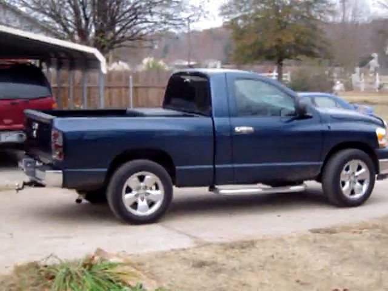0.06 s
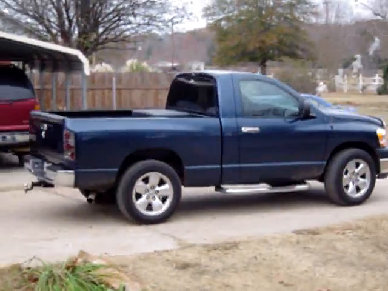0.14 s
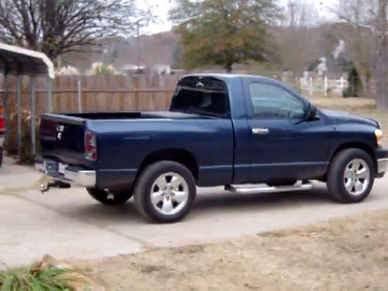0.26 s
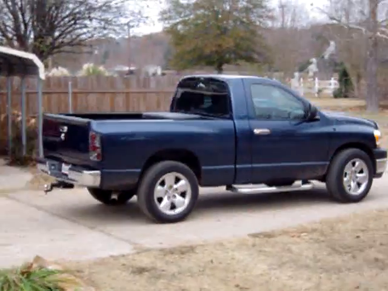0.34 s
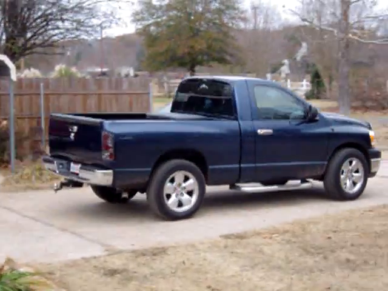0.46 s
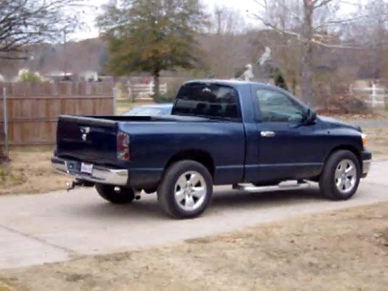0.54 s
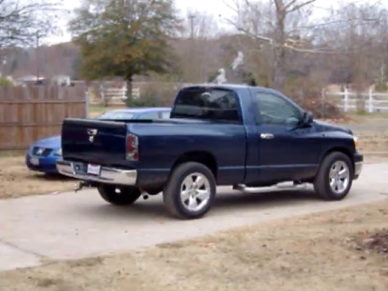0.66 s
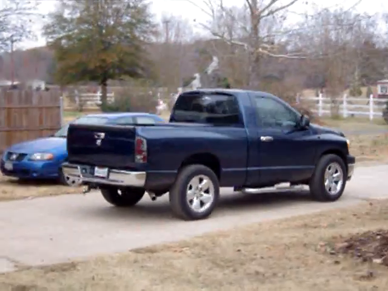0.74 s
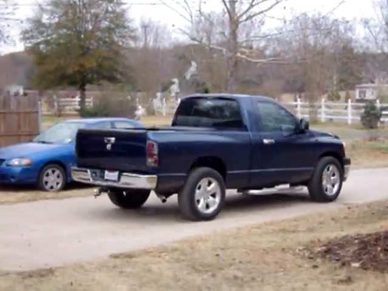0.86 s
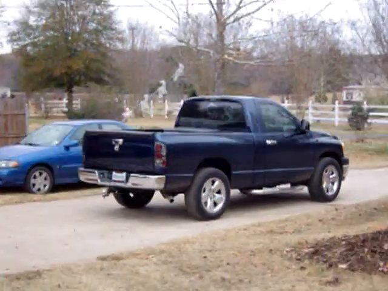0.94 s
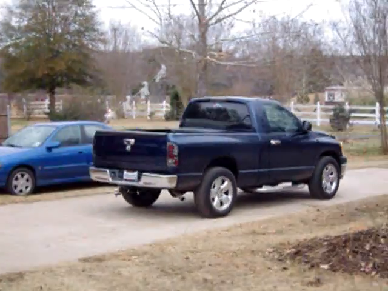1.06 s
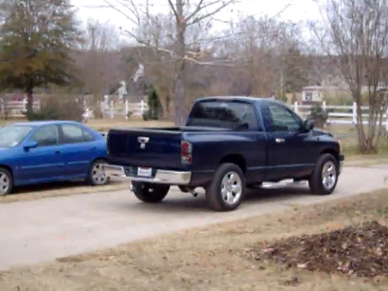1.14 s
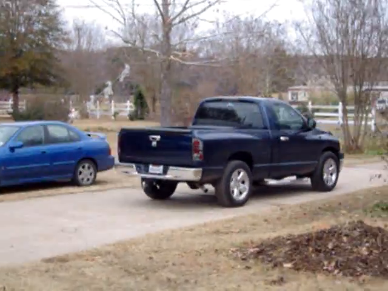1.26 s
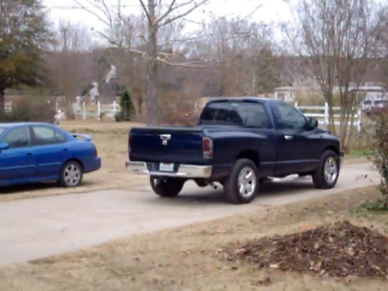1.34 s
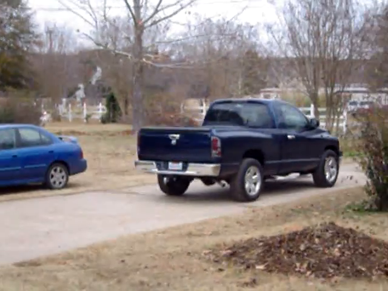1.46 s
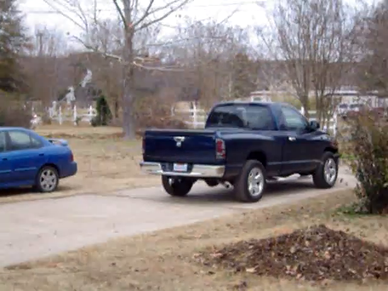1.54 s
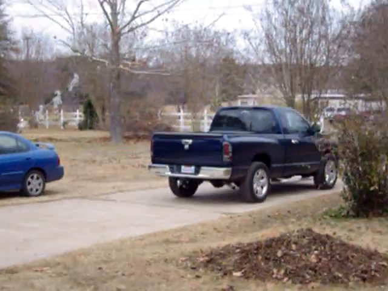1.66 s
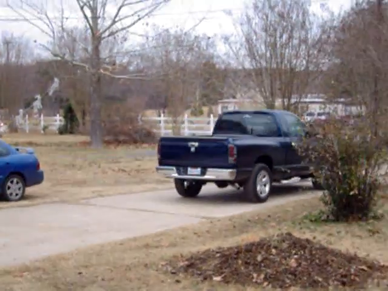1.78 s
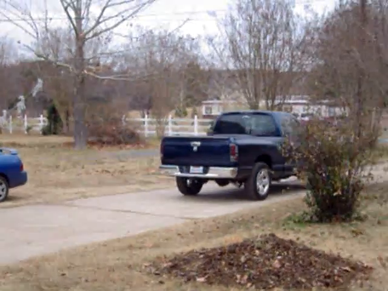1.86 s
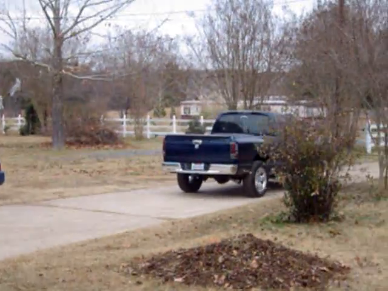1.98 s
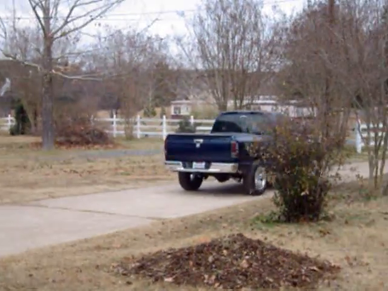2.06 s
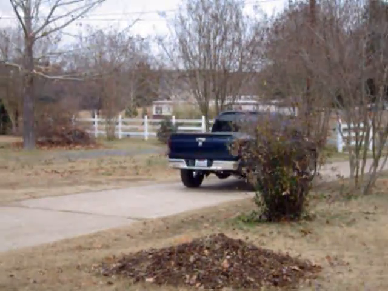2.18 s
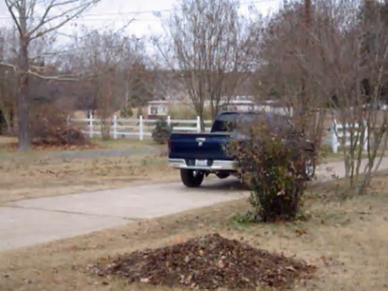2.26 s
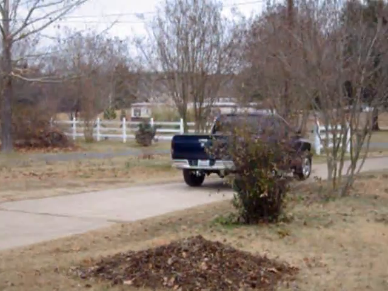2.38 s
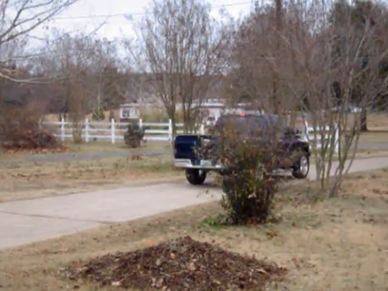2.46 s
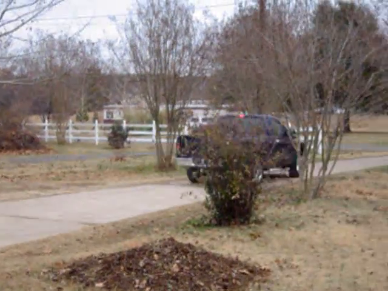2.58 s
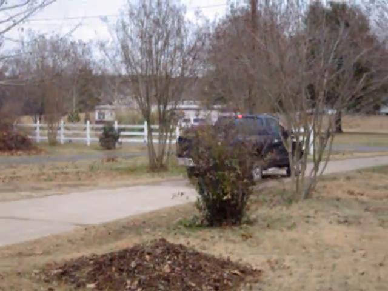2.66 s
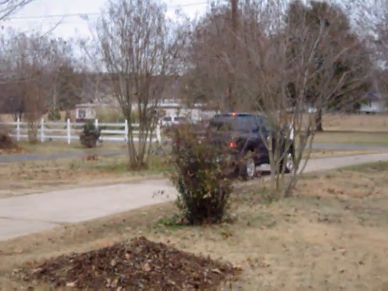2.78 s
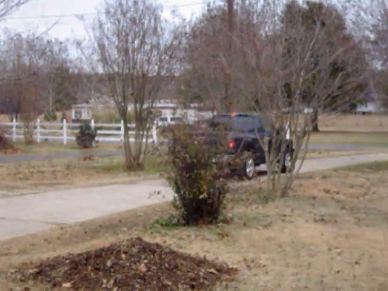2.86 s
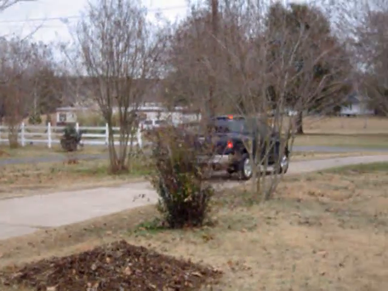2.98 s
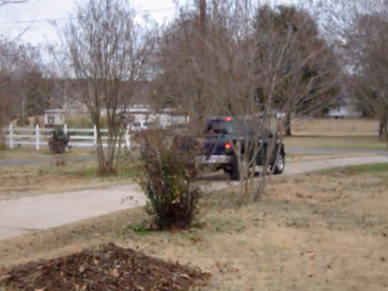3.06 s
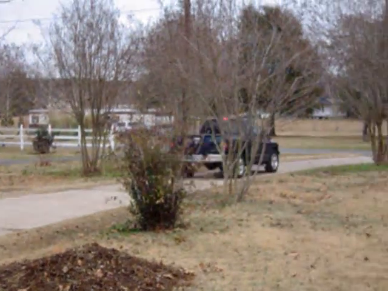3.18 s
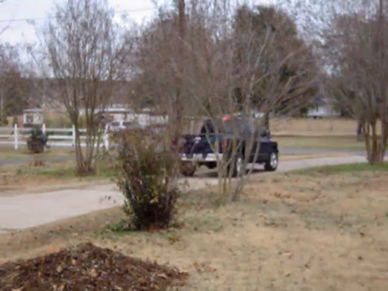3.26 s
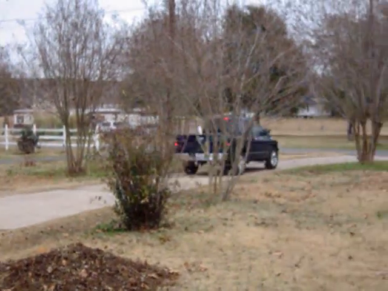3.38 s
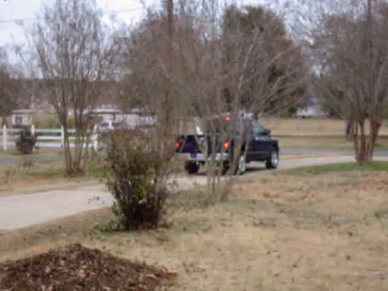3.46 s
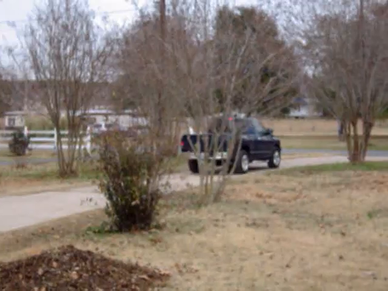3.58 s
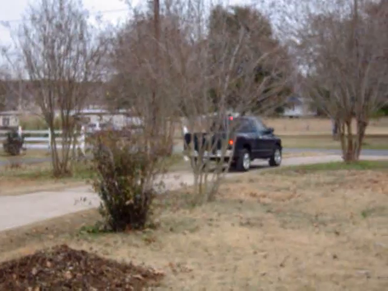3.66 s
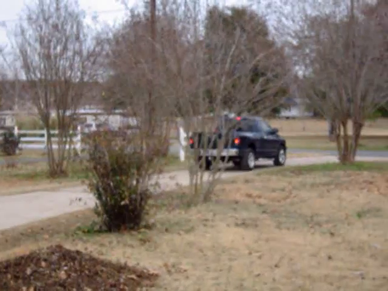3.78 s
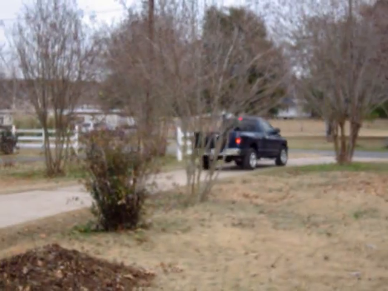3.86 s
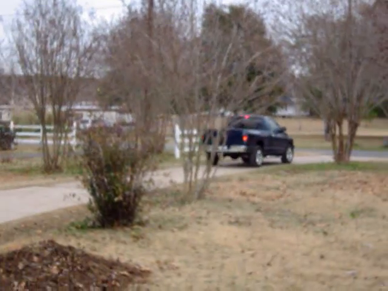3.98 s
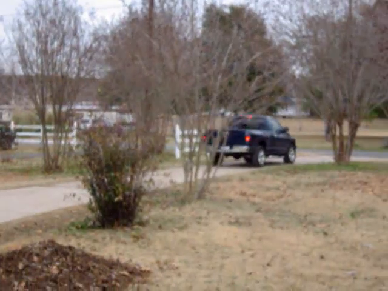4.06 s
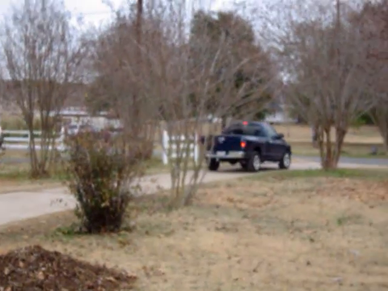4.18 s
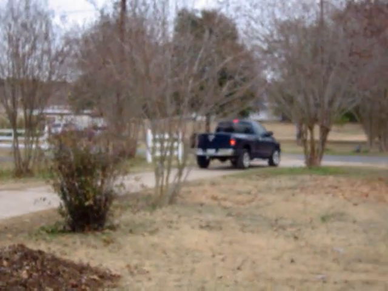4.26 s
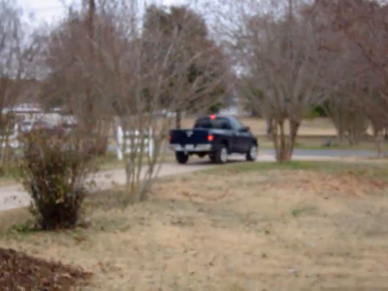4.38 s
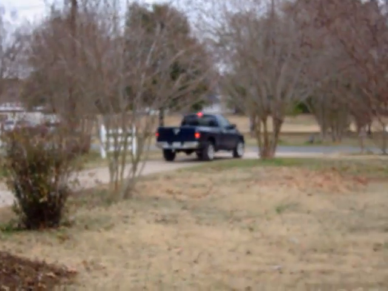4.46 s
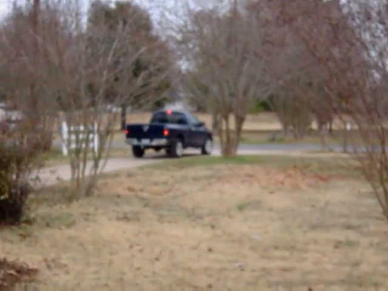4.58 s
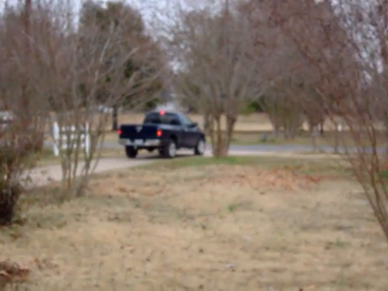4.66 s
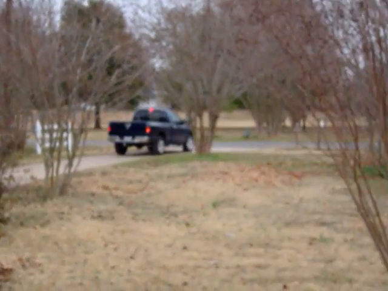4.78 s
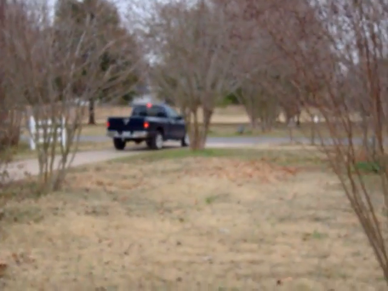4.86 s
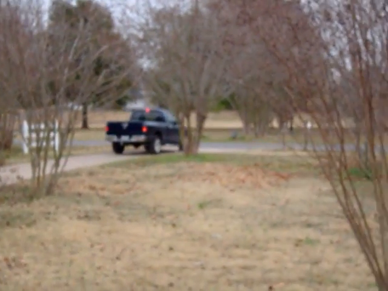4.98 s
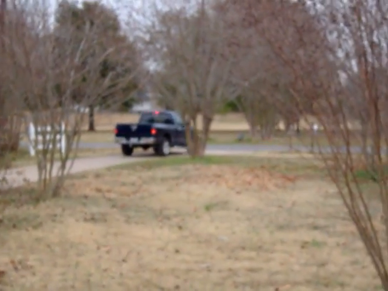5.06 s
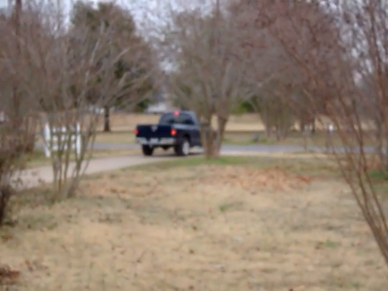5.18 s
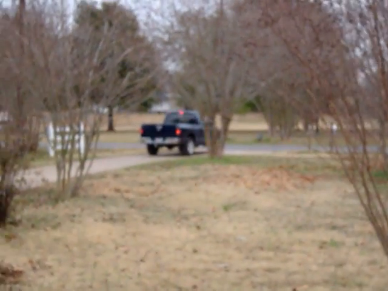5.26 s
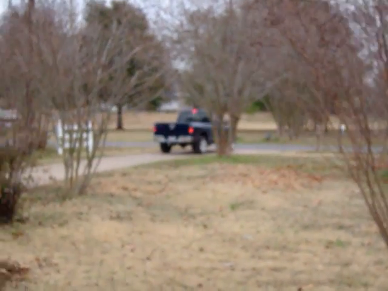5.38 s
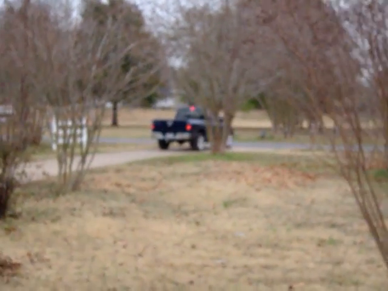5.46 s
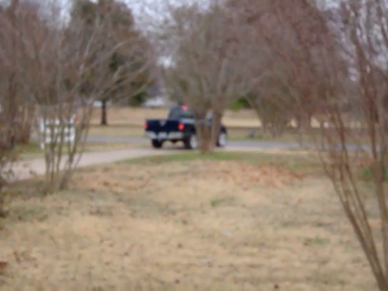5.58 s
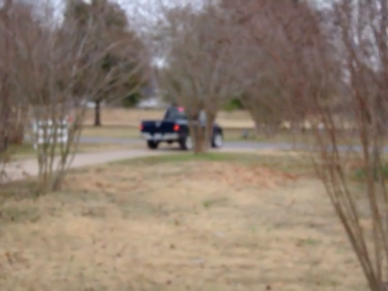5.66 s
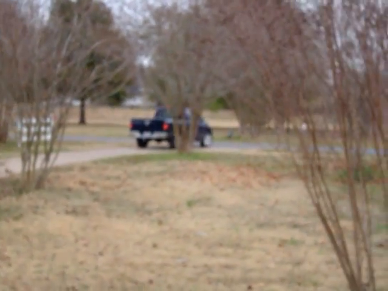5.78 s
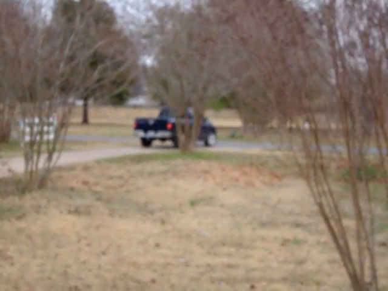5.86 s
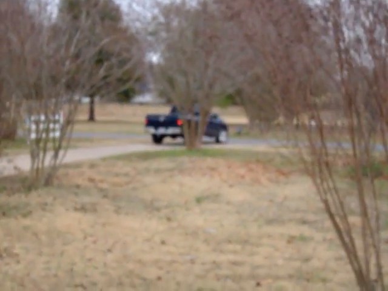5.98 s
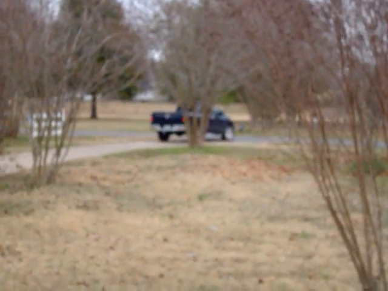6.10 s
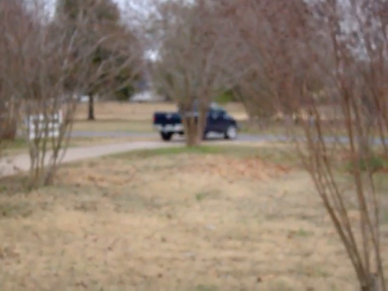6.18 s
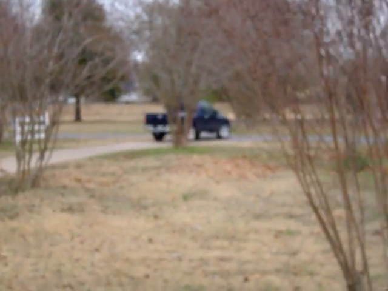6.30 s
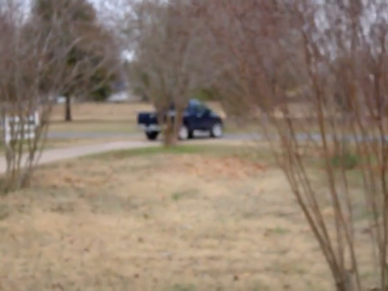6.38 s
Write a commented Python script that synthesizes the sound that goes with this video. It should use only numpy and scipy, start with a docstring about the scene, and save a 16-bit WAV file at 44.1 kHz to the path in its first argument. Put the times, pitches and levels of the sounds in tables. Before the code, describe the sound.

Outdoors, close to a driveway, a pickup's open V8 exhaust is already roaring at 0 s, loud, raspy and tinny, with bright engine hiss. Its pitch sags over the first half second and the level eases; small dry ticks click near the microphone around 0.7 s. From about 0.8 to 2.2 s it pulls steadily, pitch rising slightly, the boom swelling to a second peak near 1.5 s and becoming hollower as the truck shows its tail, with brief metallic overtones flaring. From 2.2 to 3 s the throttle lifts: pitch slides down and the sound collapses to a low burble. It then coasts quietly, settling by 4.5 s into a soft, uneven, throbbing idle far off. A gritty scuff and tick stand out close by around 4.3 s. Faint squeaky twitters flicker from 4.8 to 5.7 s, over steady air hiss and a thin hum, with slight late rubs until 6.4 s.

```python
"""An open V8 exhaust booms and rasps as a pickup pulls away down a concrete drive, lifts off and lopes at idle.
The note is built from orders of the engine cycle, weighted by a booming pipe; some high orders flare up.
Noise puffed at each firing gives rasp, tinny ring, burble, howl and engine bay hiss.
Near the microphone come scuffs and ticks of shaped noise, with faint wavering tones for twitters.
A steady outdoor hiss of coloured noise and a thin sine hum lie underneath."""
import sys
import numpy as np
from scipy import signal
from scipy.fft import rfft, irfft
from scipy.io import wavfile
from scipy.ndimage import uniform_filter1d

SR = 44100
rng = np.random.default_rng(int(sys.argv[2]) if len(sys.argv) > 2 else 0)


def wav_record(signal):
    """Record a signal, one row per channel, as 16-bit PCM in the file named by sys.argv[1]."""
    frames = np.transpose(np.atleast_2d(signal))
    bounded = np.clip(frames, -1, 1)
    # unit amplitude maps onto the largest positive 16-bit level
    quanta = np.round(bounded * 32767).astype(np.int16)
    wavfile.write(sys.argv[1], SR, quanta)


N = 283563
TIME = np.arange(N) / SR

# In every colour table the levels are relative: the filtered noise is brought to rms 1.

# Engine speed. Each row: time in seconds, speed in cycles per second (eight firings to a cycle).
ENGINE_SPEED = [(0.0, 16.3), (0.1, 15.86), (0.27, 14.32), (0.42, 13.54), (0.6, 13.37), (0.8, 13.47),
                (1.0, 13.95), (1.25, 14.66), (1.7, 15.08), (2.22, 15.24), (2.42, 14.38), (2.62, 12.82),
                (2.76, 11.32), (2.87, 9.42), (2.94, 9.12), (3.02, 8.57), (3.15, 8.65), (3.55, 8.89),
                (3.8, 8.6), (4.05, 8.33), (4.45, 7.23), (4.75, 7.15), (5.1, 7.38), (5.38, 7.13),
                (5.6, 7.36), (5.9, 7.31), (6.43, 7.12)]
# A blip, a steady pull, then the foot comes off. Each row: time in seconds, throttle from 0 to 1.
THROTTLE = [(0, 0.98), (.13, 0.77), (.28, 0.63), (.48, 0.57), (.8, 0.6), (1.35, 0.8), (1.8, 0.76),
            (2.2, 0.58), (2.55, 0.45), (2.85, 0.28), (3.9, 0)]
# The engine goes from pulling to coasting. Each row: time in seconds, load from 0 to 1.
ENGINE_LOAD = [(2.25, 1), (2.7, 0)]
# The truck swings away. Each row: time in seconds, share heard from behind.
SHARE_BEHIND = [(.75, 0), (1.3, 1)]
# The truck turns onto the road. Each row: time in seconds, share of the turn.
ONTO_ROAD = [(5.2, 0), (5.7, 1)]
CRANK_START = .27  # where the engine stands in its cycle at the start, in cycles
KERB_M, DRIVE_M_S = 3.39, 3.15  # distance at the start; speed down the drive

# Gain on the summed exhaust orders. Each row: time in seconds, gain in dB.
EXHAUST_GAIN = [(0, -32), (.15, -34), (.35, -38.5), (.65, -39), (1, -33), (1.5, -29), (2.2, -32),
                (2.45, -41), (2.56, -51), (2.68, -56), (2.77, -56), (2.84, -58), (2.88, -63.5),
                (3.05, -57.5), (3.95, -57.5), (4.45, -53.3), (5.7, -52.8), (6.43, -55)]
# Which bank fires at each of the eight firings of a cycle, 0 or 1.
FIRING_BANK = np.array([0, 1, 1, 0, 1, 0, 0, 1])
# Uneven banks favour some orders.
# Each row: order as a multiple of the cycle rate, relative level in dB when pulling, the same when coasting.
ORDER_LEVELS = [(3, 13.0, 28.0), (4, -22.0, 3.0), (5, -1.3, 11.0), (6, -16.0, -11.0), (7, -2.0, -8.0),
                (8, 7.0, 8.5), (9, -13.5, -4.0), (10, -10.5, -6.5), (11, -19.5, 6.0), (12, -22.0, -5.0),
                (13, -13.5, 1.0), (14, -12.0, -4.5), (15, -9.5, -7.0), (16, 4.0, 11.5), (17, -3.0, -8.0),
                (18, -1.5, -9.0), (19, 16.0, -16.5), (20, 8.0, -13.0), (21, 13.0, -10.0), (22, 6.5, -14.5),
                (23, 6.5, -22.5), (24, -0.5, -11.0), (25, 7.0, -14.0), (26, 0.0, -15.5), (27, 1.0, -12.0),
                (28, -5.0, -13.5), (29, -1.0, 5.5), (30, 1.0, 0.5), (31, 1.0, 8.0), (32, -3.0, 20.0),
                (33, -0.0, 8.0), (34, -1.0, 10.0), (35, 2.0, 15.5), (36, 1.5, 9.0), (37, 2.5, 7.0),
                (38, 9.0, 3.5), (39, 3.0, 5.0), (40, 8.0, 9.5), (41, 0.0, 5.5), (51, 0.0, 13.0)]
# The orders while the revs drop with the throttle shut.
# Each row: order as a multiple of the cycle rate, relative level in dB.
RUNDOWN_LEVELS = [(3, 24), (4, 6), (5, 10), (6, 1), (7, -4), (8, 5), (9, -10), (10, -4), (11, 5), (12, -6),
                  (13, 1), (17, 2), (19, 12), (22, 8), (25, 0)]
# Pipe under load from beside the truck. Each row: frequency in Hz, response in dB.
PIPE_BESIDE = [(50.0, -27.5), (66.0, 18.5), (80.0, 18.0), (92.0, 8.5), (110.0, 10.5), (128.0, 7.5),
               (145.0, 20.0), (160.0, 27.0), (185.0, 21.0), (220.0, 2.5), (260.0, -0.0), (290.0, -11.0),
               (330.0, -5.0), (400.0, -9.5), (500.0, -7.0), (620.0, -42.0)]
# Pipe under load from behind the truck. Each row: frequency in Hz, response in dB.
PIPE_BEHIND = [(50.0, -31.5), (74.0, 11.0), (90.0, 3.0), (110.0, -18.0), (128.0, 0.0), (152.0, 19.5),
               (175.0, 18.0), (212.0, 22.0), (243.0, 4.5), (265.0, -4.0), (290.0, -18.0), (340.0, -12.5),
               (420.0, -19.5), (480.0, -9.5), (620.0, -39.5)]
# Pipe when coasting. Each row: frequency in Hz, response in dB.
PIPE_COASTING = [(25.0, -53.5), (45.0, 0.5), (70.0, -4.5), (95.0, 4.5), (115.0, 8.0), (135.0, 22.5),
                 (150.0, 29.0), (175.0, 15.0), (215.0, -2.0), (260.0, -14.5), (295.0, -0.5), (330.0, -9.5),
                 (380.0, -19.0), (500.0, -8.0)]
# Shift of the coasting note once on the road. Each row: frequency in Hz, change in dB.
ROAD_SHIFT = [(60, 0), (95, 6), (118, 0), (150, -3), (175, -4), (215, 1), (260, 0), (295, -2), (340, -3),
              (370, 0)]
BURN_SCATTER = .06  # unevenness of the burns at order 20: share in level, radians in phase
LOPE_LOW, LOPE_UPPER = .34, .6  # depth of the idle surge in the low and upper orders, as shares
UPPER_LAG = .57  # cycles by which the upper orders answer the low surge
DRIFT_DB = .7  # how far each order wanders in level

# Rasp from beside the truck. Each row: frequency in Hz, density in dB per Hz.
RASP_BESIDE = [(200, -14), (330, 3), (400, -4), (500, 1.5), (570, -2), (640, 1), (760, 1.5), (870, -5),
               (1000, 0.5), (1200, -5), (1550, -13.5), (2200, -18.5), (5000, -33)]
# Rasp from behind the truck. Each row: frequency in Hz, density in dB per Hz.
RASP_BEHIND = [(200, -17.5), (350, -3), (420, -1.5), (490, -2.5), (570, -3.5), (680, 0.5), (760, 2),
               (870, 0.5), (1020, 1.5), (1130, -2.5), (1280, -2), (1500, -8.5), (2200, -19), (5000, -45.5)]
# Engine bay hiss. Each row: frequency in Hz, density in dB per Hz.
BAY_COLOUR = [(900, -7), (1600, -8.5), (1950, -4), (2400, -6.5), (2800, -7.5), (3300, -10), (4000, -9),
              (5000, -9.5), (6200, -17.5), (8000, -19), (10000, -28)]
# Level at the kerb with the throttle shut, and the rise at full throttle.
RASP_DB, RASP_RISE_DB = -34.5, 13.5
BAY_DB, BAY_RISE_DB = -47, 24.5
# The tailpipe's tinny ring. Each row: time in seconds, level in dB.
RING_LEVEL = [(0, -32), (.15, -26.5), (.3, -37.5), (.5, -48), (.85, -46), (1.15, -36), (1.6, -39),
              (2.1, -45), (2.6, -60.5), (6.43, -77.5)]
# Colour of that ring. Each row: frequency in Hz, density in dB per Hz.
RING_COLOUR = [(1900, -34), (2200, 3.5), (2350, 4), (2520, 4), (2800, -31.5), (5000, -58)]
# Burble inside the pipe, before the idle lope. Each row: time in seconds, level in dB.
BURBLE_LEVEL = [(0, -27), (.15, -28), (.45, -46), (2.1, -45), (2.4, -41), (2.85, -39), (3.3, -48), (4, -48),
                (6.43, -55)]
# Colour of the burble. Each row: frequency in Hz, density in dB per Hz.
BURBLE_COLOUR = [(45, -24), (80, -13), (118, -12), (148, -4), (180, -5.5), (220, -1), (255, -1), (293, 7),
                 (330, -12.5), (400, -21), (480, -12), (600, -28), (2000, -63)]
# A hollow pipe resonance heard from straight behind. Each row: time in seconds, level in dB.
HOWL_LEVEL = [(1.4, -53), (1.9, -33), (2.35, -35), (2.65, -45), (3, -62), (6.43, -56)]
# Colour of that howl. Each row: frequency in Hz, density in dB per Hz.
HOWL_COLOUR = [(420, -29), (465, 1), (520, -4.5), (580, -22), (900, -18.5), (1020, -8.5), (1230, -11),
               (1500, -31), (5000, -70)]
# Orders that flare up as reflections shift.
# Each row: start in seconds, length in seconds, peak level in dB, order as a multiple of the cycle rate.
FLARES = [(.04, .2, -24, 20), (.2, .25, -34, 50), (.45, .36, -33, 37), (.52, .28, -29, 47),
          (.76, .24, -32, 48), (.92, .45, -30, 27), (.98, .28, -33, 71), (1.1, .5, -32, 26),
          (1.26, .14, -31, 69), (1.26, .14, -33, 53), (1.42, .4, -25, 19), (1.6, .23, -30.5, 50),
          (1.86, .17, -33, 67), (2.22, .25, -34, 23), (2.45, .25, -40, 26)]
FLARE_BLUR, FLARE_FLUTTER_DB = .012, 2.5  # phase wobble in radians per order; level flutter

# Scuffs close by. Each row: start in seconds, length in seconds, peak level in dB.
SCUFFS = [(4.145, 0.13, -40.5), (4.303, 0.039, -37.5), (4.343, 0.077, -26), (4.39, 0.064, -42),
          (4.716, 0.11, -44), (5.66, 0.18, -47.5), (6.17, 0.1, -48)]
# Colour of the scuffs. Each row: frequency in Hz, density in dB per Hz.
SCUFF_COLOUR = [(250, -14), (650, -0.5), (900, -2.5), (1010, 6.5), (1120, -4), (1230, 7.5), (1450, 0),
                (2300, 2.5), (3200, -3), (4200, -1), (5600, -8), (8000, -12), (10000, -17)]
# Small ticks. Each row: start in seconds, level in dB, centre in Hz, decay in seconds.
TICKS = [(.664, -18, 1700, .004), (.666, -23, 850, .008), (.670, -22, 2700, .003), (.678, -22, 4700, .0015),
         (.681, -33, 7800, .004), (.714, -34, 6800, .006), (4.352, -27, 1600, .008),
         (4.39, -25, 3500, .004), (5.276, -34.5, 680, 0.008), (5.362, -40, 5900, 0.0082)]
# Faint twitters. Each row: start in seconds, length in seconds, peak level in dB, pitch in Hz.
TWITTERS = [(4.78, .06, -51, 2290), (4.9, .045, -48, 2300), (4.935, .04, -42.5, 2110),
            (5.03, .13, -47.5, 2090), (5.195, .06, -48, 2280), (5.18, .12, -48.5, 2090),
            (5.332, .04, -43.5, 2250), (5.32, .11, -46.5, 2040), (5.44, .21, -47, 2090),
            (5.63, .12, -46.5, 2040), (3.8, 0.11, -56, 1180), (5.157, 0.078, -50, 1180)]
# Outdoor hiss. Each row: frequency in Hz, density in dB per Hz.
AIR_COLOUR = [(45, -2.5), (200, 7), (330, -8), (380, -0.5), (420, -8), (470, -2), (540, -6), (700, -10.5),
              (950, -20.5), (1150, -25.5), (1600, -11.5), (2100, -11.5), (2500, -13.5), (5000, -19.5),
              (10000, -33)]
# Thin hum. Each row: time in seconds, rms level in dB.
HUM_LEVEL = [(0, -64), (3, -52), (4.5, -50), (6.43, -47)]
HUM_HZ = 584
TOP_HZ = 10100  # where the steep low-pass begins to cut


def exhaust(hz, turn, behind, far_bank=0.94):
    """The two banks fire unevenly, so many multiples of the cycle rate sound; the pipe favours some."""
    load, turned = curve(ENGINE_LOAD), curve(ONTO_ROAD)
    # while the revs drop with the throttle shut, one order after another slides through the pipe's boom
    settled = np.interp(hz, [9.3, 9.9], [1, 0])
    # one bank's pulses take the longer way to the tailpipe
    firing = np.arange(8) / 8 + .052 * FIRING_BANK
    strength = np.where(FIRING_BANK, far_bank, 1)
    low, upper = 0, 0
    for order, pulling_db, coasting_db in ORDER_LEVELS:
        f = order * hz
        pipe_db = (1 - behind) * response_db(PIPE_BESIDE, f) + behind * response_db(PIPE_BEHIND, f)
        loaded = pulling_db + pipe_db
        falling_db = np.interp(order, *np.transpose(RUNDOWN_LEVELS))
        coasting = settled * coasting_db + (1 - settled) * falling_db
        coasting = coasting + response_db(PIPE_COASTING, f) + turned * response_db(ROAD_SHIFT, f)
        # reflections shift as the truck moves: a random drift in each order's level
        db = load * loaded + (1 - load) * coasting + DRIFT_DB * walk(3.11)
        lead = np.angle(np.sum(strength * np.exp(-2j * np.pi * order * firing)))
        lead = lead + load * ringing(PIPE_BEHIND, f) + (1 - load) * ringing(PIPE_COASTING, f)
        # no two burns are alike, which blurs the high orders most
        blur = BURN_SCATTER * order / 20
        level = undb(db) * (1 + blur * walk(17))
        tone = level * np.cos(2 * np.pi * order * turn + lead + blur * walk(14))
        if order < 26:
            low = low + tone
        else:
            upper = upper + tone
    # near idle a low surge on every cycle is answered by the upper orders
    low = low * lope(hz, turn, LOPE_LOW)
    upper = upper * lope(hz, turn, LOPE_UPPER, UPPER_LAG)
    return (low + upper) * undb(curve(EXHAUST_GAIN))


def ringing(points, hz):
    """Minimum phase (radians) of a pipe with this (Hz, dB) response: it rings on after each pulse."""
    grid = np.arange(2049)  # Hz
    cepstrum = irfft(np.log(undb(response_db(points, grid))))
    # keeping only the causal half gives the phase that belongs to the gain
    phase = 2 * rfft(cepstrum[:len(grid)], len(cepstrum)).imag
    return np.interp(hz, grid, phase)


def lope(hz, turn, depth, lag=0):
    """Near idle the engine surges once in every cycle; lag is a share of the cycle."""
    slow = np.interp(hz, [7.4, 9, 12], [1, .25, 0])
    return 1 + depth * slow * np.cos(2 * np.pi * (turn - 1 / 4 - lag))


def rasp(turn, throttle, behind):
    """Gas jets out of the tailpipe at each firing, coloured by the side it is heard from."""
    jet = puffs(turn, depth=1.0, scatter_db=2.5, repeat=2.2)
    heard = (1 - behind) * colour(jet, RASP_BESIDE) + behind * colour(jet, RASP_BEHIND)
    return heard * driven_gain(throttle, RASP_DB, RASP_RISE_DB)


def tailpipe_ring(turn):
    """The firing puffs set off a narrow, tinny ring in the tailpipe."""
    puffed = puffs(turn, depth=1.5, scatter_db=1.5, repeat=1.8)
    return colour(puffed, RING_COLOUR) * undb(curve(RING_LEVEL))


def burble(hz, turn):
    """Low gas noise tumbles inside the pipe and surges with the upper orders near idle."""
    puffed = puffs(turn, depth=1.1, scatter_db=-1.0, repeat=0.31)
    level = undb(curve(BURBLE_LEVEL)) * lope(hz, turn, LOPE_UPPER, UPPER_LAG)
    return colour(puffed, BURBLE_COLOUR) * level


def howl(turn):
    """The firing puffs excite a hollow resonance of the pipe."""
    puffed = puffs(turn, depth=0.68, scatter_db=0.0, repeat=1.7)
    return colour(puffed, HOWL_COLOUR) * undb(curve(HOWL_LEVEL))


def bay_hiss(turn, throttle):
    """Bright engine bay noise swells at each firing and rises with the throttle."""
    puffed = puffs(turn, depth=.7, scatter_db=3.5, repeat=.6)
    return colour(puffed, BAY_COLOUR) * driven_gain(throttle, BAY_DB, BAY_RISE_DB)


def driven_gain(throttle, db, rise_db):
    """Gain that rises with the throttle and falls with distance down the drive."""
    spread = KERB_M / np.hypot(KERB_M, DRIVE_M_S * TIME)
    return spread * undb(db + rise_db * throttle)


def puffs(turn, depth, scatter_db, repeat):
    """Noise swells at each firing; a part that repeats every cycle and slowly changes joins fresh noise."""
    count = 8 * turn
    size = undb(scatter_db * rng.standard_normal(size=2000))[count.astype(int)]
    gate = 1 + depth * size * np.exp(-(count % 1) / 0.73)  # decay in firing intervals
    # four fixed noise cycles, in a slowly changing blend
    cycles = rng.standard_normal((4, 2048))
    blend = np.array([walk(4) for _ in cycles])
    place = (turn % 1 * cycles.shape[1]).astype(int)
    alike = np.sum(blend * cycles[:, place], axis=0) / np.linalg.norm(blend, axis=0)
    return gate * (repeat * alike + rng.standard_normal(N))


def flares(turn):
    """Single orders rise for a moment, gliding with the engine; the highest are the roughest."""
    out = 0
    for s, length, db, order in FLARES:
        blur = FLARE_BLUR * order * walk(70)
        out = out + swells([(s, length, db)]) * np.cos(2 * np.pi * order * turn + blur)
    return out * undb(FLARE_FLUTTER_DB * walk(60))


def scuffs():
    """Short rubs that swell and stop, their noise made gritty by a fast level flutter."""
    grit = rng.standard_normal(N) * undb(2.0 * walk(700))
    return swells(SCUFFS) * colour(grit, SCUFF_COLOUR)


def ticks():
    """Dry ticks, each a quickly dying band of noise."""
    out = 0
    for s, db, hz, decay in TICKS:
        band = colour(rng.standard_normal(N), [(hz / 3, -18), (hz, 0), (hz * 2, -8), (hz * 10, -50)])
        out = out + undb(db) * band * (TIME >= s) * np.exp(-abs(TIME - s) / decay)
    return out


def twitters(waver_hz=85, flutter_db=2.5):
    """Faint squeaky notes that waver quickly in pitch and level."""
    out = 0
    for s, length, db, hz in TWITTERS:
        phase = 2 * np.pi * np.cumsum(hz + waver_hz * walk(400)) / SR
        out = out + swells([(s, length, db)]) * np.sin(phase)
    return out * undb(flutter_db * walk(70))


def background(air_db=-41.5):
    """Near-steady outdoor hiss of coloured noise, and a thin sine hum with a slight phase wander."""
    air = colour(rng.standard_normal(N), AIR_COLOUR) * undb(air_db + .5 * walk(24))
    hum_wave = np.sqrt(2) * np.sin(2 * np.pi * HUM_HZ * TIME + .15 * walk(2.2))
    return air + undb(curve(HUM_LEVEL)) * hum_wave


def undb(db):
    """Decibels to gain."""
    return 10 ** (np.asarray(db) / 20)


def curve(rows):
    """A (seconds, value) table joined by straight lines in time."""
    return np.interp(TIME, *np.transpose(rows))


def response_db(points, hz):
    """Level of a (Hz, dB) spectrum at the given frequencies, joined along log frequency."""
    f, db = np.transpose(points)
    return np.interp(np.log(hz + 1e-9), np.log(f), db)


def colour(x, points):
    """Filter by a spectrum that falls away below its first point; rms 1."""
    hz = np.arange(N + 1) * SR / (2 * N)
    low_cut = np.minimum(hz / points[0][0], 1) ** 2
    y = irfft(rfft(x, 2 * N) * undb(response_db(points, hz)) * low_cut)[:N]
    return y / y.std()


def walk(rate):
    """Random levels held 1 / rate s and slewed twice; spread near 1."""
    k = int(SR / rate)
    steps = np.repeat(rng.standard_normal(N // k + 1), k)
    smooth = uniform_filter1d(uniform_filter1d(steps, k), k)
    return (smooth / np.sqrt(1 / 2))[:N]


def swells(rows):
    """A rounded rise and fall for each (start s, length s, dB) row."""
    return sum(undb(db) * np.sin(np.pi * np.clip((TIME - s) / length, 0, 1)) for s, length, db in rows)


def scene():
    """One engine cycle drives the exhaust note, the gas noises and the flares together."""
    hz, throttle, behind = curve(ENGINE_SPEED), curve(THROTTLE), curve(SHARE_BEHIND)
    turn = CRANK_START + np.cumsum(hz) / SR  # cycles turned so far
    gas = rasp(turn, throttle, behind) + tailpipe_ring(turn) + burble(hz, turn)
    gas = gas + howl(turn) + bay_hiss(turn, throttle)
    truck = exhaust(hz, turn, behind) + gas + flares(turn)
    return (truck + scuffs() + ticks() + twitters() + background())[None]


def record(dry):
    """A steep elliptic low-pass cuts the top octave."""
    return signal.sosfilt(signal.ellip(12, .2, 80, TOP_HZ, fs=SR, output="sos"), dry)


dry = scene()
out = record(dry)
wav_record(out)
```